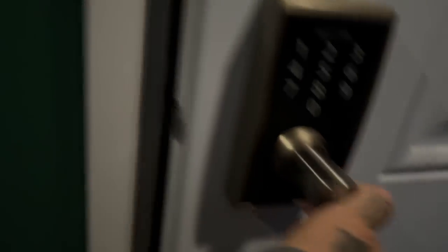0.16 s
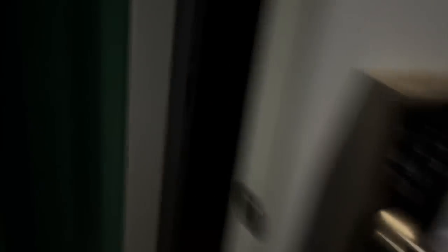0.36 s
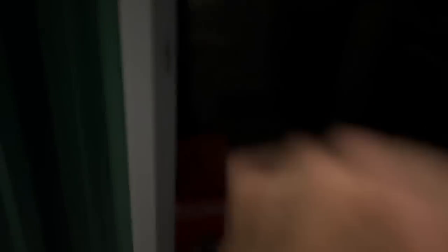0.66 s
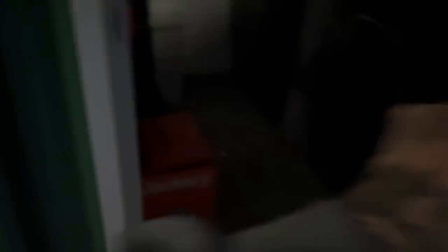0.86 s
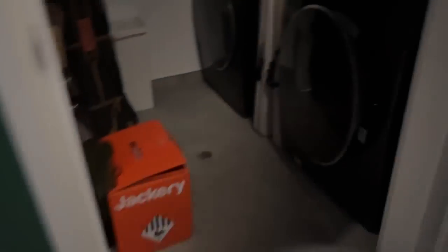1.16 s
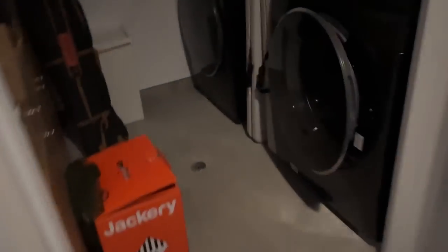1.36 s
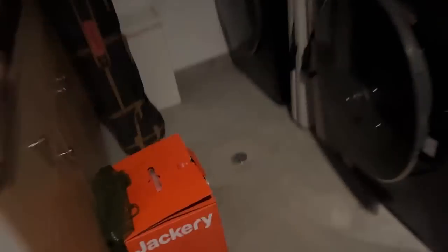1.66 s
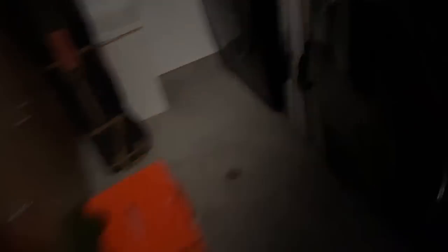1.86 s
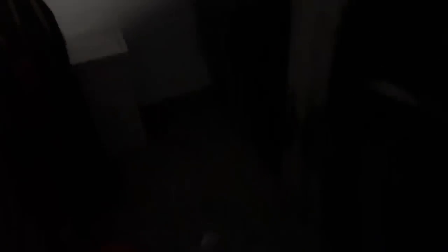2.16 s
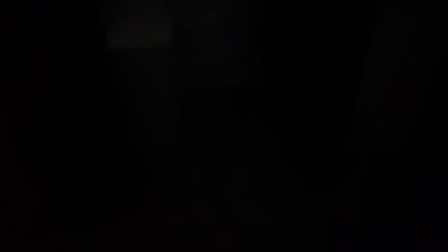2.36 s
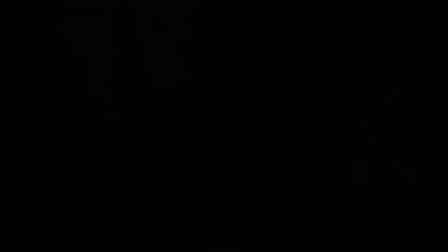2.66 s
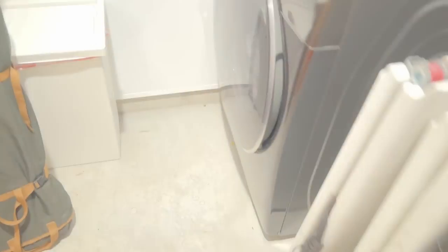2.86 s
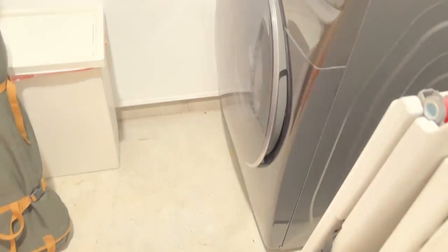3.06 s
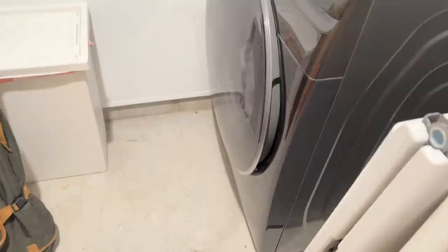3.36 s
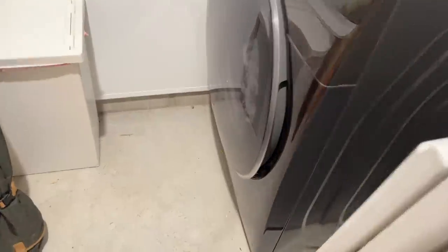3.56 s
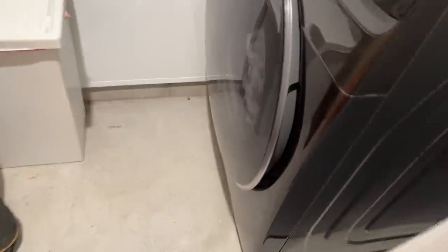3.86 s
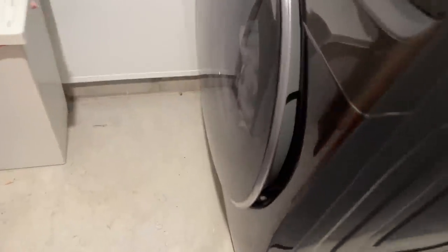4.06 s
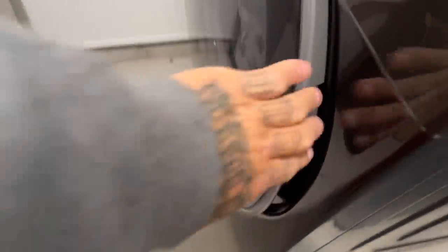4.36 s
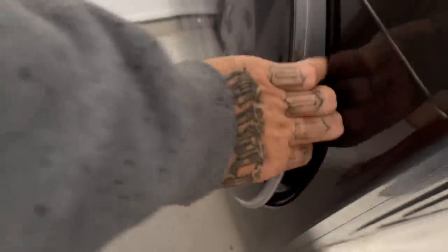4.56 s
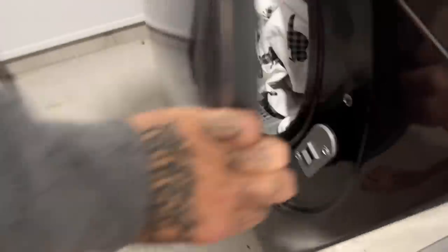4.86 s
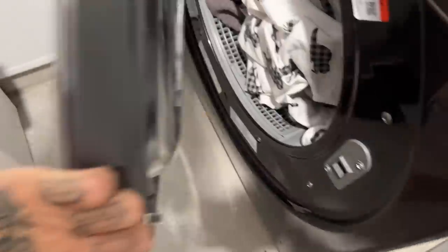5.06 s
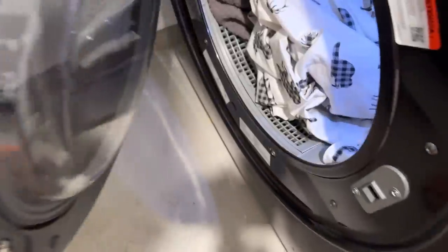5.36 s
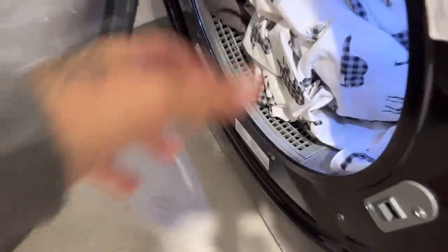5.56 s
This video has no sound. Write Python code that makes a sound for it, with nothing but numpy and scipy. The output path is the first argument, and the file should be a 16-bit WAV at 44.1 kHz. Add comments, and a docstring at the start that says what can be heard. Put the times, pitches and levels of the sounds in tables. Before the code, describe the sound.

The sound is close, in a small laundry room with a hard floor that rings briefly after each hit. It opens with low knocks and a light click as a lever handle turns. From 0.4 to 0.6 seconds the latch rattles in sharp clicks over hollow door thumps, with one more click at 0.8. Soft footfalls and faint sleeve rustle follow until about 2.5. A loud hollow thud with a scuff lands at 2.65. Rubber soles squeak briefly at 3.2, 3.4 and 4.0, and a heavy step near 3.4 brings a deep floor rumble and a swell of cloth rustle. Small knocks and clicks start around 4.5, then the dryer door catch snaps open at 4.75, the sharpest sound, with a low thump beneath. Soft rustling and a faint tick near 5.5 end it.

```python
"""A small laundry room with a hard floor, as someone walks in. A lever latch rattles in sharp clicks.
The door, footsteps and cabinets thud as blows set their panels ringing. Rubber soles slip and squeak,
the floor sways under the heaviest steps, and a dryer door catch snaps. In between, sleeves rustle
and the structure shakes with a low rumble. The room rings briefly after each hit."""
import sys
import numpy as np
from scipy import signal
from scipy.fft import rfft, irfft
from scipy.io import wavfile
from scipy.ndimage import uniform_filter1d

SR = 44100
rng = np.random.default_rng(int(sys.argv[2]) if len(sys.argv) > 2 else 0)


def materialize(psi):
    """Save the field psi as 16-bit PCM at rate SR to the path in sys.argv[1].

    A 1-D psi becomes a single channel; in a 2-D psi each row is a channel.
    """
    bounded = np.clip(np.atleast_2d(psi).T, -1, 1)
    quanta = np.round(bounded * 32767).astype(np.int16)
    wavfile.write(sys.argv[1], SR, quanta)


N = 251370

# Tone colours of noise, from lowest to highest pitch: f/Hz, relative level/dB
HUSH_TONE = [(40, 0), (300, -8), (2000, -14.5), (9000, -26.5), (12000, -42.5)]
TREBLE_TONE = [(1200, -4), (2200, 1.5), (3500, 0), (6000, 2.5), (8500, -1), (10500, -4.5), (11500, -36)]  # bright part of the rustle
SHEEN_TONE = [(10000, -9), (10800, -6.5), (12000, -20.5), (16000, -15.5)]  # its very top
BODY_TONE = [(300, -2.5), (480, -2), (800, -3), (1300, -4.5), (2200, -8.5), (3200, -17), (5000, -42)]  # its middle
DEEP_TONE = [(20, -28), (35, -4), (55, 1.5), (70, 4), (100, -8.5), (140, -41)]  # low wobble of the structure
BOOM_TONE = [(70, -36), (120, 3), (200, -3), (400, -10), (600, -16), (900, -28)]  # the boom above that
# How alike left and right sound: f/Hz, likeness (1 = the same)
LIKENESS = [(40, 1), (130, 0.8), (300, 0.57), (640, 0.077), (3000, 0.028), (7000, 0.053)]
# Bursts of cloth and sole hiss: peak t/s, rise/s, fall/s, treble level/dB, sheen level/dB, body level/dB
RUSTLES = [(.04, 1, 0.025, -35, -40, -46), (.45, .05, .12, -43, -44, -28.5),
           (.492, .012, 0.019, -34, -37, -45), (.542, 0.0086, .012, -43, -41, -39),
           (.575, .03, 0.059, -49, -54, -30), (.8, 0.043, .015, -56, -66, -47),
           (1.05, 0.092, .15, -69.5, -75, -77), (1.72, 0.57, 0.31, -51.5, -65, -55),
           (1.99, 0.12, 0.065, -57, -64, -75), (2.32, 0.23, .15, -40.5, -46, -51.5),
           (2.54, 0.12, 0.22, -46.5, -56, -54.5), (2.66, 0.17, 1, -51.5, -68, -53),
           (2.8, 0.19, 0.12, -44.5, -56.5, -41), (3.05, .06, .17, -51, -81, -35.5),
           (3.19, 0.0094, .13, -36, -64, -33), (3.37, 0.07, 0.13, -39.5, -49, -64),
           (3.42, 0.042, 0.18, -34.5, -65, -24.5), (3.48, 0.19, 0.05, -37, -49, -27.5),
           (3.93, .3, .3, -50, -54, -62), (4.002, 0.016, 0.16, -40, -69, -38.5),
           (4.07, 0.19, 0.069, -39.5, -42.5, -52), (4.514, 0.15, 0.98, -54.5, -65, -51.5),
           (4.729, .005, .12, -27.5, -40.5, -27), (4.94, 0.03, 0.041, -54.5, -59, -53),
           (5.32, .2, .3, -45, -55, -56.5), (5.44, 0.2, 0.13, -48, -57.5, -80),
           (5.53, 0.015, 0.23, -46.5, -54.5, -56)]
# Faint hiss under the bursts: t/s, treble level/dB, body level/dB
HISS_BED = [(0, -54.5, -49.5), (.25, -53, -53), (.34, -54.5, -54), (.65, -58, -54), (1.15, -57, -52.5),
            (1.5, -65.5, -55), (2.17, -56, -53.5), (2.95, -56, -66), (3.16, -91, -56), (3.6, -63, -45),
            (3.87, -60, -66), (4.38, -62.5, -64), (4.9, -66, -52.5), (5.19, -59, -60), (5.7, -61, -58)]
# Dips in the hiss after the two loudest blows: start t/s, end t/s, change in level/dB
HISS_DIPS = [(3.6, 3.895, -16), (4.95, 5.184, -12)]
# Shudders of the structure: peak t/s, rise/s, fall/s, deep level/dB, boom level/dB
SHUDDERS = [(.02, 0.23, 0.54, -64, -39.5), (.41, 0.18, 0.28, -43, -44), (.6, 0.29, .1, -56, -30.5),
            (.78, 0.13, 0.21, -35, -45), (1.6, 0.19, .3, -48, -62), (1.82, 0.23, 0.13, -38, -38.5),
            (2.7, 0.076, 0.1, -35, -27.5), (3.11, .2, 0.21, -32, -38.5), (3.46, 0.089, 0.091, -35, -25),
            (3.55, 0.12, 0.092, -27, -41), (3.83, .3, 0.29, -46.5, -80), (4.08, 0.19, 0.053, -59, -52),
            (4.62, 0.18, 0.32, -52, -39), (4.76, .2, 0.32, -37, -39), (5.7, 0.17, .3, -52, -59)]
# Blows on door, floor and cabinets ("ring" or t60 is the time to fade by 60 dB):
# t/s, level/dB, centre f/Hz, ring/s, spread/octaves, hardness/dB
THUDS = [(0.004, -30, 56.5, 0.49, 0.71, -32), (0.054, -20.5, 56, 0.35, 0.77, -24),
         (0.101, -23.5, 70.1, 0.047, 0.37, -14), (0.135, -39, 81, 0.41, 0.46, -15),
         (0.185, -27, 86.1, 0.11, 0.33, -20), (0.419, -12.5, 102, 0.23, 0.87, -23),
         (0.446, -15, 85, 0.3, 0.88, -10), (0.479, -14.5, 124, 0.14, 0.97, -1),
         (0.65, -27, 75.4, 0.069, 0.77, -19), (0.693, -23, 77, 0.1, 0.46, -33),
         (0.746, -30, 61.3, 0.18, 0.97, -30), (0.789, -28, 61, 0.12, 0.37, -25),
         (0.912, -30.5, 63.4, 0.12, 0.61, -39), (1.419, -24, 130, 0.3, 0.29, -24.5),
         (1.472, -30, 136, 0.39, 0.42, -42), (1.611, -35, 116, 0.32, 0.41, -26),
         (1.759, -32.5, 59.2, 0.22, 0.45, 3), (1.815, -28, 75.4, 0.073, 0.7, -16),
         (1.833, -20.5, 104, 0.098, 0.59, -33), (1.894, -29.5, 183, 0.067, 0.34, -25),
         (2.113, -39.5, 181, 0.16, 0.35, -16), (2.473, -32, 240, 0.15, 0.44, -21),
         (2.5, -22, 88.4, 0.48, 0.35, -34), (2.638, -8.5, 147, 0.36, 0.95, -11),
         (2.666, -12.5, 190, 0.29, 0.55, -4), (3.043, -26.5, 227, 0.65, 0.59, -10),
         (3.392, -18.5, 56.5, 0.68, 0.37, 4), (3.422, -12, 56.5, 0.78, 0.24, 10),
         (3.618, -24, 56, 0.37, 0.24, -16), (4.471, -27.5, 66, 0.17, 0.56, -30),
         (4.515, -27, 58.4, 0.09, 0.6, -27), (4.585, -31, 91, 0.12, 0.32, -12),
         (4.635, -26, 100, 0.087, 0.83, -9), (4.733, -21, 114, 0.31, 0.49, -9),
         (4.765, -20.5, 100, 0.35, 0.54, -3.5), (5.559, -40, 60, 0.42, 0.77, -12)]
# The panels' modes, the notes they naturally ring at: f/Hz, relative level/dB
PANEL_MODES = [(38, -2), (52, 3.5), (64, 5), (93, 3), (115, 2.5), (131, -2.5), (160, 0.5), (195, 1.5),
               (235, 3), (270, 3.5), (312, 3.5), (385, 2), (465, 7.5), (570, 4.5), (690, 2.5), (880, 0)]
# Latch, handle and catch clicks ("pan" is left minus right):
# t/s, level/dB, centre f/Hz, ring/s, width as a share of f, relative tick level/dB, pan/dB
CLICKS = [(.088, -32.5, 940, 0.032, 0.3, -22, 15), (.397, -29, 970, 0.036, .8, -24, -6),
          (0.407, -33, 3000, 0.011, 0.54, -6, 4), (0.413, -29, 8140, 0.01, 0.14, -19, 14),
          (.432, -26.5, 2430, 0.022, 0.74, 2, -3), (.447, -17, 1630, 0.038, 0.33, -3, 0),
          (.489, -15.5, 1470, 0.062, 0.46, -8.5, -0.5), (0.502, -23, 1610, 0.021, .6, -19, 2),
          (.543, -18.5, 1440, 0.0097, 0.4, -11, 0), (.566, -27.5, 2330, 0.0073, 0.78, 0, 14),
          (0.578, -29.5, 3690, 0.012, 0.4, -8, -4), (.606, -31.5, 1870, 0.036, 0.31, -12, 0),
          (.796, -30, 3320, .012, 0.81, 0, -3), (1.411, -47, 794, 0.058, 0.52, -16, -10),
          (1.758, -37.5, 1190, 0.1, 1, -14, -7), (2.536, -30, 9000, .024, 0.45, -4, -4),
          (2.972, -43, 1210, 0.042, .4, -20, -7), (3.017, -40, 990, 0.029, .5, -23, 1),
          (4.273, -50, 13000, .015, .6, -3, 6), (4.519, -41.5, 1830, 0.19, 0.58, -12, 1),
          (4.632, -25.5, 830, 0.012, 0.43, -21, 4.5), (4.633, -33, 2320, 0.0078, 0.22, -21.5, 1),
          (4.647, -37.5, 1560, 0.016, 0.23, -39, 2), (4.717, -31, 1240, 0.28, 0.45, -26, 2),
          (4.746, -13.5, 1430, 0.043, 1, -5, 0), (5.53, -46.5, 4350, 0.02, .3, 17.5, -4),
          (5.573, -40.5, 860, 0.084, 0.33, -20, 0)]
# Soles and loads scuffing the floor:
# t/s, level/dB, squeak f/Hz, squeak ring/s, relative hiss level/dB, hiss f/Hz, hiss ring/s, rise/ms
SCUFFS = [(2.66, -38.5, 1970, 0.12, 10, 1150, .15, 11), (2.797, -37, 1880, 0.094, 11.5, 6150, 0.26, 1.3),
          (3.047, -41, 1470, 0.13, 5, 1500, 0.12, 0.77), (3.186, -19, 1784, 0.19, -10.5, 5500, 0.21, 2.2),
          (3.392, -28.5, 2120, 0.091, 9, 1110, 0.17, 13), (3.998, -24.5, 1924, 0.15, -7.5, 3950, 0.25, 2.6)]
# Sways of the floor: peak t/s, level/dB
SWAYS = [(3.237, -22), (3.323, -19), (3.442, -10.5), (3.56, -25), (3.672, -28), (3.864, -41), (3.955, -45)]
# Modes of the dryer door catch: f/Hz, relative level/dB
CATCH_MODES = [(1250, -11), (1600, -6), (2090, 1), (2350, -4), (2800, -7), (3400, -7), (4300, -6),
               (5900, -14.5)]
# How long the room rings: f/Hz, ring/s
ROOM_RING = [(60, 0.48), (250, 0.46), (700, 0.37), (2000, 0.34), (5000, 0.41), (10000, 0.19)]
# Phase shift between the sides in the high treble: f/Hz, lead of the left/radians
PHASE_TURN = [(8270, 0), (9730, -2.6), (10900, -3.9), (11700, -6.3), (12500, -6.3), (13200, -9.2),
              (14400, -9.7), (15200, -12.6)]


def undb(db):
    """Turn a level in dB into a number to multiply by."""
    return 10 ** (np.asarray(db) / 20)


def at(table, hz):
    """Read a table's value at a frequency, blending between rows on a log scale."""
    f, v = np.transpose(table)
    return np.interp(np.log(hz + 1), np.log(f), v)


def hiss(table, n):
    """Stereo noise of average size (rms) 1 in the given tone colour; the bass is alike on both sides."""
    hz = np.fft.rfftfreq(n, 1 / SR)
    mid, side = rfft(rng.standard_normal((2, n)))
    alike = np.clip(at(LIKENESS, hz), 0, 1)
    inside = (hz > table[0][0]) & (hz < table[-1][0])
    mid, side = mid * np.sqrt(1 + alike), side * np.sqrt(1 - alike)
    noise = irfft(np.array([mid + side, mid - side]) * undb(at(table, hz)) * inside, n)
    return noise / np.std(noise)


def wander(rate):
    """A smooth random curve that heads for a new value `rate` times a second."""
    hold = int(SR / rate)
    steps = np.repeat(rng.standard_normal(N // hold + 1), hold)
    return uniform_filter1d(uniform_filter1d(steps, hold), hold)[:N]


def swells(rows):
    """One loudness curve per level column; a swell gains 20 dB in its rise and loses 20 dB in its fall."""
    rows, t = np.array(rows), np.arange(N) / SR
    coarse = t[::16]
    peak, rise, fall = rows[:, :3].T[:, :, None]
    distance = np.maximum((peak - coarse) / rise, (coarse - peak) / fall)
    power = undb(-20 * distance ** 1.09) ** 2  # the 1.09 slightly rounds the top
    return [np.interp(t, coarse, np.sqrt(undb(2 * db) @ power)) for db in rows[:, 3:].T]


def fade(t, rise_ms, t60):
    """Rise quickly, then die away by 60 dB every t60 seconds."""
    return (1 - np.exp(-t * 1000 / max(rise_ms, .05))) * undb(-60 * t / max(t60, .005))


def band(x, hz, share):
    """Keep the sound near hz, in a band share * hz wide."""
    hz = min(hz, SR * .4)
    return signal.lfilter(*signal.iirpeak(hz, 1 / max(share, .02), SR), x)


def add(out, start, x, db, pan_db=0):
    """Set the peak of x to db, pan it and mix it in at the start time."""
    i = int(max(start, 0) * SR)
    x = x[..., :N - i] * undb(db) / np.max(np.abs(x))
    out[:, i:i + x.shape[-1]] += x * undb([[pan_db / 2], [-pan_db / 2]])


def steady_hush():
    """A faint, steady hush under everything."""
    return undb(-72) * hiss(HUSH_TONE, N)


def sleeve_rustle(pan_db=1.5, sink_s=.12):
    """Rubbing cloth makes bursts of flickering hiss over a faint bed; twice the level dips."""
    t = np.arange(N) / SR
    times, *levels = np.transpose(HISS_BED)
    bed_treble, bed_body = [undb(np.interp(t, times, db)) for db in levels]
    treble, sheen, body = swells(RUSTLES)
    treble, body = np.hypot(treble, bed_treble), np.hypot(body, bed_body)  # hypot adds their power
    sheen = np.hypot(sheen, bed_treble * undb(-24))
    grain_db = 2.1 * wander(60) + 0.59 * wander(300)
    high = treble * hiss(TREBLE_TONE, N) + sheen * undb(1.3 * wander(40)) * hiss(SHEEN_TONE, N)
    middle = body * undb(1.5 * wander(30)) * hiss(BODY_TONE, N)
    # each dip sinks gradually and comes back at once; the middle dips less
    dip_db = sum(db * np.clip((t - start) / sink_s, 0, 1) * (t < end) for start, end, db in HISS_DIPS)
    cloth = high * undb(grain_db + dip_db) + middle * undb(.6 * dip_db)
    return cloth * undb([[pan_db / 2], [-pan_db / 2]])


def structure_shake(rest_db=-61.5):
    """The structure shudders with an uneven wobble and boom, and rumbles faintly in between."""
    deep, boom = np.hypot(swells(SHUDDERS), undb(rest_db))
    wobble = deep * undb(2.5 * wander(12)) * hiss(DEEP_TONE, N)
    return wobble + boom * undb(0.7 * wander(24.92)) * hiss(BOOM_TONE, N)


def panel_thuds(rise_ms=4.2):
    """A blow rings the modes near its centre pitch, a hard one also those above; high ones die sooner."""
    out, t = np.zeros((2, N)), np.arange(SR // 2) / SR
    hz, db = np.transpose(PANEL_MODES)
    for start, peak_db, centre, t60, spread, hard_db in THUDS:
        detune, phase, skew = rng.standard_normal((3, len(hz)))
        near_centre = undb(db - 3.9 * (np.log2(hz / centre) / spread) ** 2)
        gain = near_centre + undb(db + hard_db) * (hz > centre)
        fades = np.array([fade(t, rise_ms * min(centre / f, 1), t60 * (centre / f) ** .5) for f in hz])
        # left and right meet each mode slightly out of step
        apart = 0.89 * skew * np.arccos(np.clip(at(LIKENESS, hz), 0, 1))
        angle = 2 * np.pi * np.outer(hz * (1 + 0.0364 * detune), t) + 0.93 * phase[:, None]
        thud = [gain @ (np.sin(angle + side * apart[:, None]) * fades) for side in (.5, -.5)]
        add(out, start, np.array(thud), peak_db)
    return out


def latch_clicks():
    """A sharp blow and a little chatter briefly ring a small part, with a bright tick on top."""
    out, ticks, t = np.zeros((2, N)), np.zeros((2, N)), np.arange(SR // 5) / SR
    blow = 6.9 * (t == 0)
    for start, peak_db, hz, t60, share, tick_db, pan_db in CLICKS:
        noise = rng.standard_normal((2, len(t)))
        contact = blow + noise[0] * fade(t, .2, t60)
        add(out, start, band(band(contact, hz, 2 * share), hz, share), peak_db, pan_db)
        tick = band(noise[1] * fade(t, .05, 0.019), hz=9600, share=0.2)
        add(ticks, start, tick, peak_db + tick_db, pan_db)
    return out + 0.71 * ticks, 0.41 * ticks  # the part that stirs the room, the part that stays dry


def sole_scuffs():
    """Slipping rubber squeaks in a narrow band of noise over a broad hiss; a thin ring lingers."""
    out, t = np.zeros((2, N)), np.arange(SR // 2) / SR
    for start, peak_db, hz, t60, hiss_db, hiss_hz, hiss_t60, rise_ms in SCUFFS:
        slip, rub = rng.standard_normal((2, 2, len(t)))
        squeak = band(band(slip, hz, 0.16), hz, 0.16) * fade(t, rise_ms, t60)
        thin_ring = band(slip, hz * 1.03, 0.046) * fade(t, rise_ms, t60=0.58)
        scrape = band(rub, hiss_hz, 0.73) * fade(t, rise_ms, hiss_t60)
        add(out, start, squeak, peak_db)
        add(out, start, thin_ring, peak_db - 18)
        add(out, start, scrape, peak_db + hiss_db)
    return out


def floor_sway(first_hz=52, sag_hz_per_s=3.5, rise_s=0.049, fall_s=0.12):
    """The floor's lowest mode swells under the heaviest steps and slowly sags in pitch."""
    gain, = swells([(peak, rise_s, fall_s, db) for peak, db in SWAYS])
    hz = first_hz - sag_hz_per_s * (np.arange(N) / SR - SWAYS[0][0])
    return np.sqrt(2) * gain * np.sin(2 * np.pi * np.cumsum(hz) / SR + [[.15], [-.15]])


def dryer_snap():
    """One hard contact sets off all the modes of the door catch together; they die fast."""
    out, t = np.zeros((2, N)), np.arange(SR // 5) / SR
    detune = 1 + 0.012 * rng.standard_normal(len(CATCH_MODES))
    ring = sum(undb(db) * np.sin(2 * np.pi * hz * d * t) for (hz, db), d in zip(CATCH_MODES, detune))
    add(out, 4.7292, ring * fade(t, rise_ms=.1, t60=.013), db=-2, pan_db=-.5)
    return out


def room(x, db):
    """Add the room's wash of echoes to x; each octave fades at its own speed."""
    t, tail = np.arange(SR * 3 // 4) / SR, 0
    for hz in 90 * 2. ** np.arange(8):
        octave = hiss([(hz / np.sqrt(2), 0), (hz * np.sqrt(2), 0)], len(t)) * np.sqrt(hz)
        tail = tail + octave * fade(t, 0.79, at(ROOM_RING, hz))
    tail = tail / np.sqrt(np.sum(tail ** 2) / 2)
    return x + undb(db) * signal.fftconvolve(x.mean(axis=0)[None], tail, axes=1)[:, :N]


def scene():
    """Mix all the sounds; the sharp ones get more echo than the thuds."""
    clicks, dry_ticks = latch_clicks()
    thuds = room(panel_thuds(), db=-10)
    sharp = room(clicks + sole_scuffs() + dryer_snap(), db=-3) + dry_ticks
    return thuds + sharp + sleeve_rustle() + structure_shake() + floor_sway() + steady_hush()


def record(dry, join_hz=8500, top_hz=15750):
    """Above join_hz the right side is a phase-shifted copy of the left; sound above top_hz is cut."""
    hz = np.fft.rfftfreq(N, 1 / SR)
    left, right = rfft(dry)
    tied = np.clip((hz - join_hz) / 1000 + .5, 0, 1)
    right = np.sqrt(1 - tied) * right + np.sqrt(tied) * left * np.exp(-1j * at(PHASE_TURN, hz))
    steep_cut = signal.ellip(10, .2, 60, top_hz, fs=SR, output="sos")
    return signal.sosfilt(steep_cut, irfft(np.array([left, right]), N))


dry = scene()
out = record(dry)
materialize(out)
```